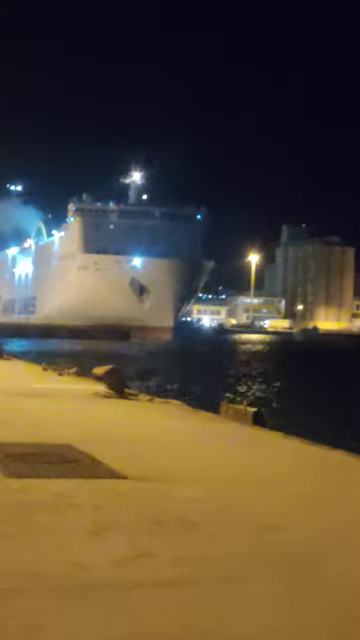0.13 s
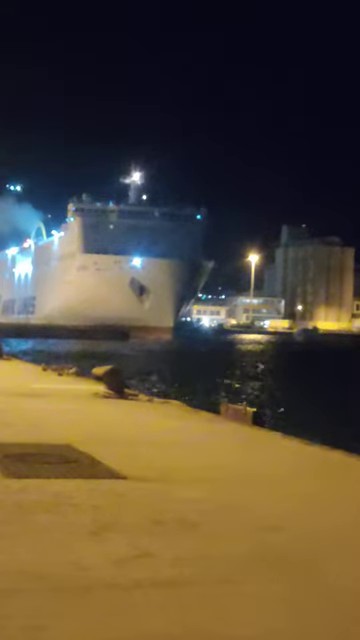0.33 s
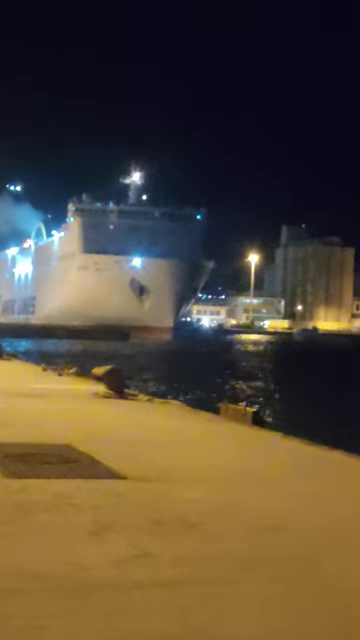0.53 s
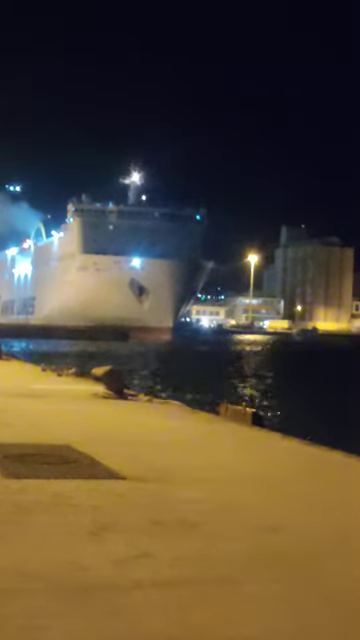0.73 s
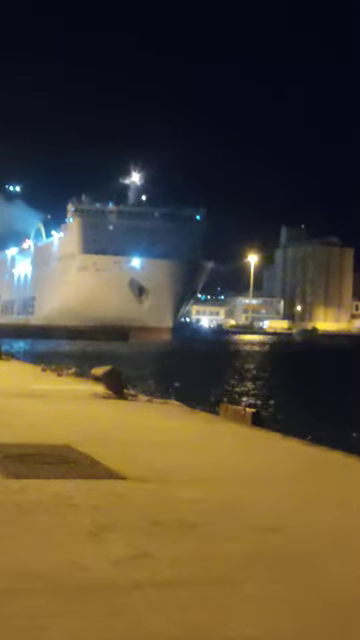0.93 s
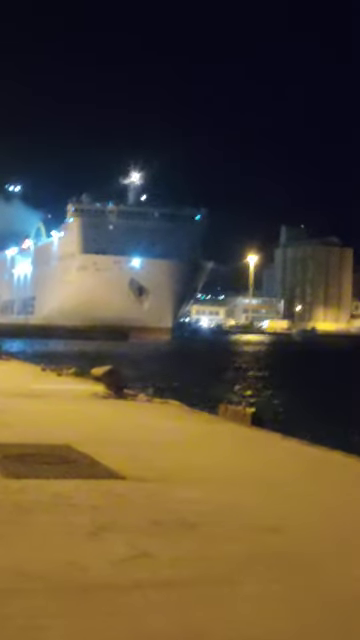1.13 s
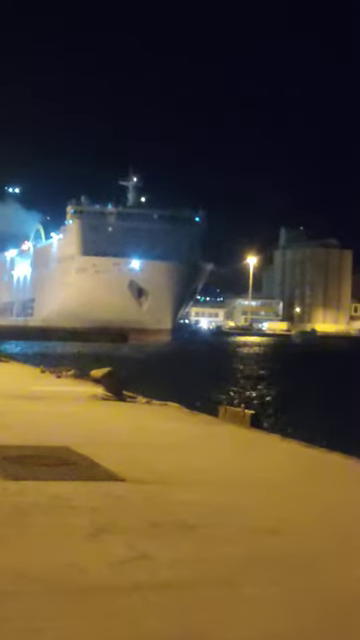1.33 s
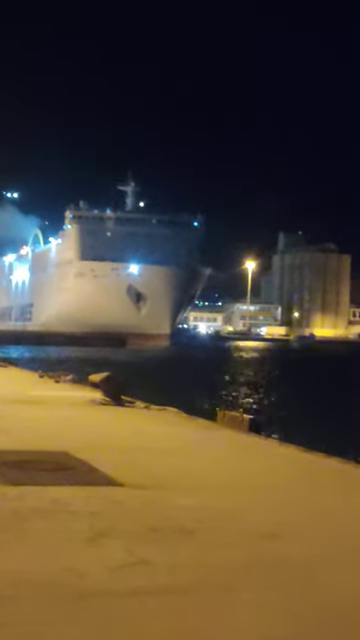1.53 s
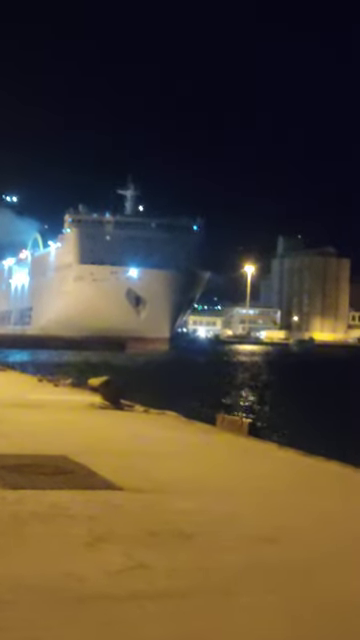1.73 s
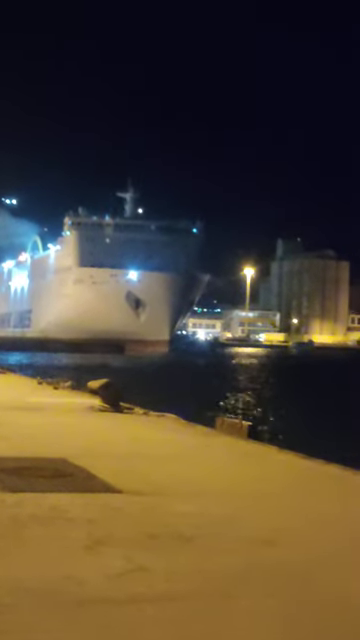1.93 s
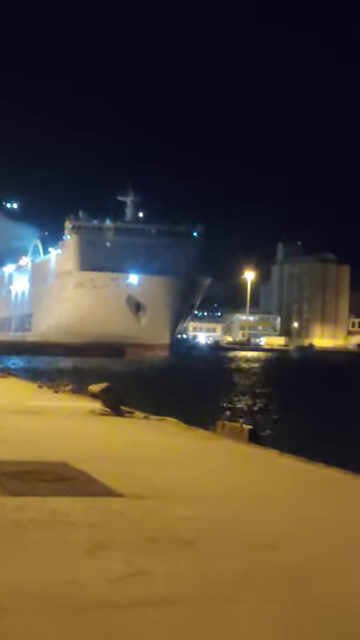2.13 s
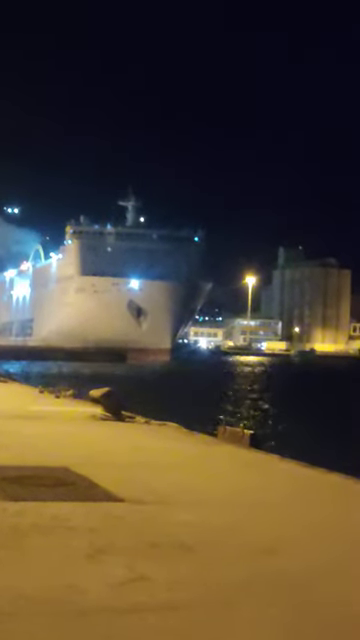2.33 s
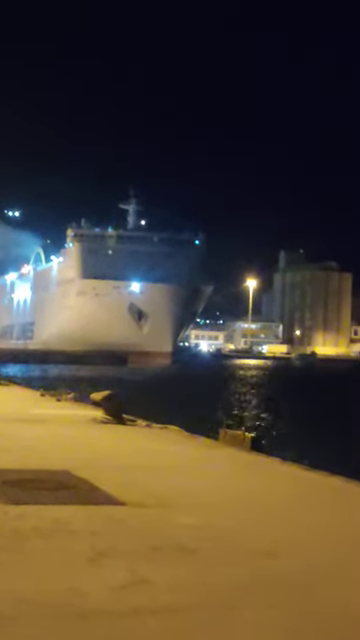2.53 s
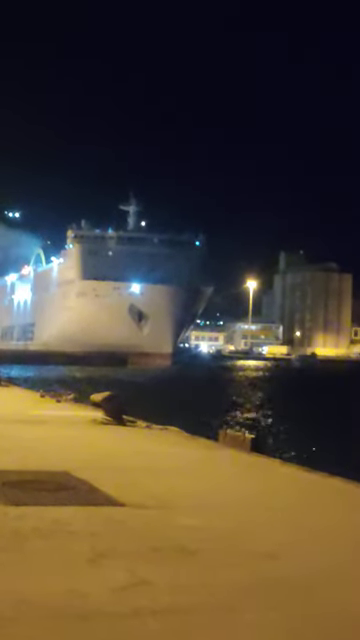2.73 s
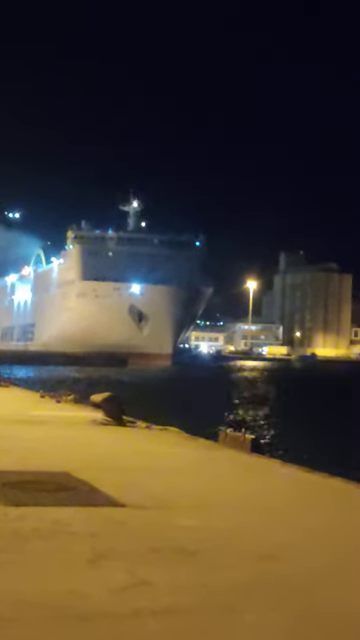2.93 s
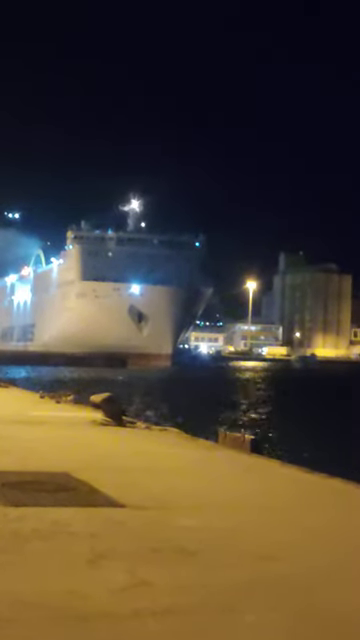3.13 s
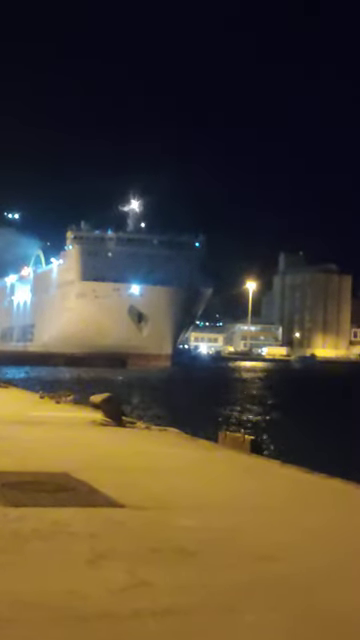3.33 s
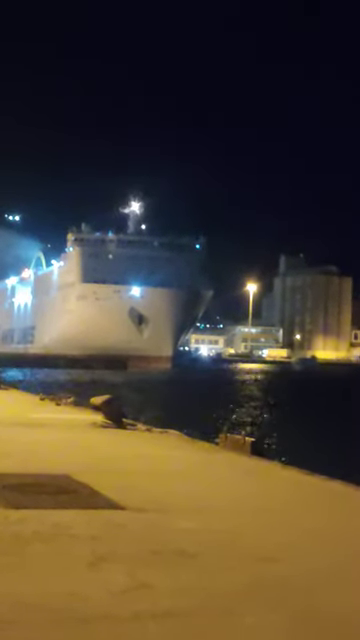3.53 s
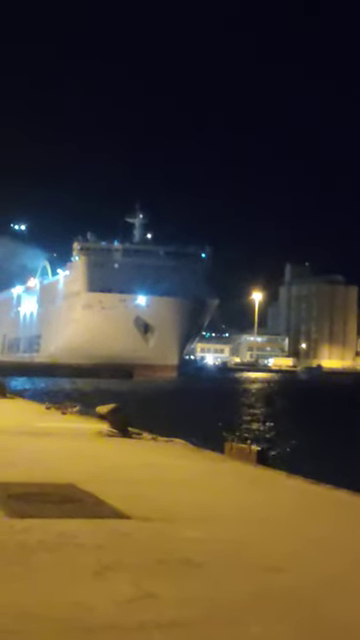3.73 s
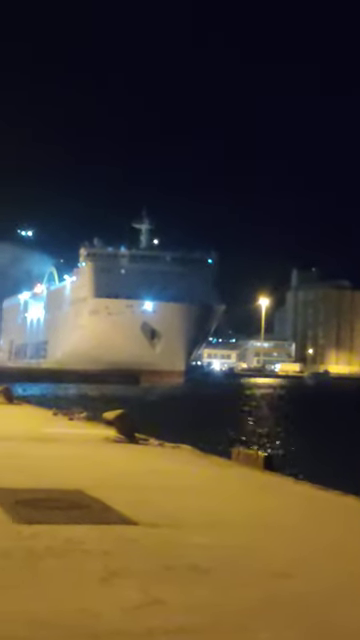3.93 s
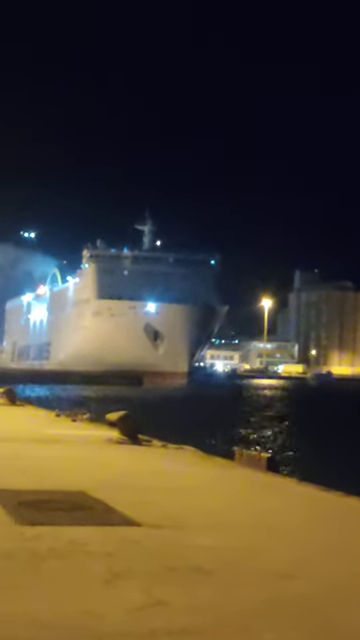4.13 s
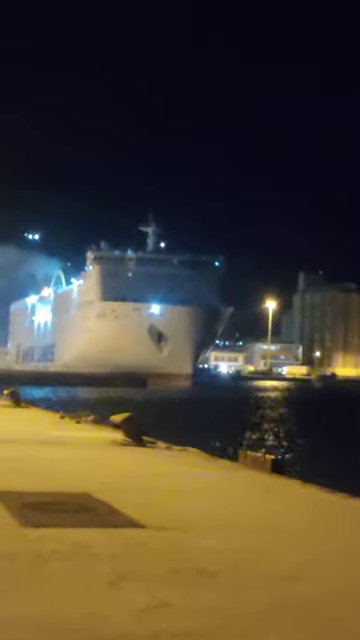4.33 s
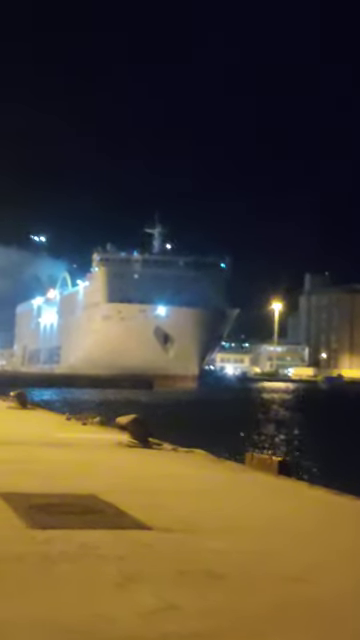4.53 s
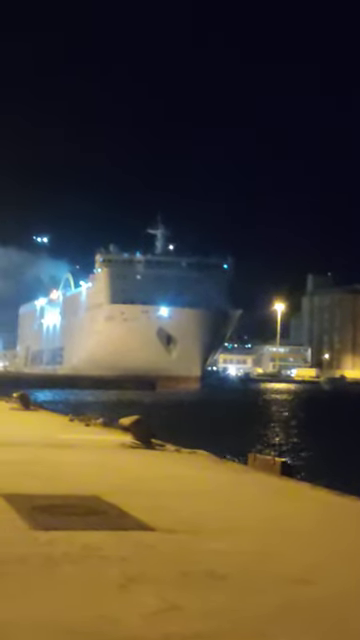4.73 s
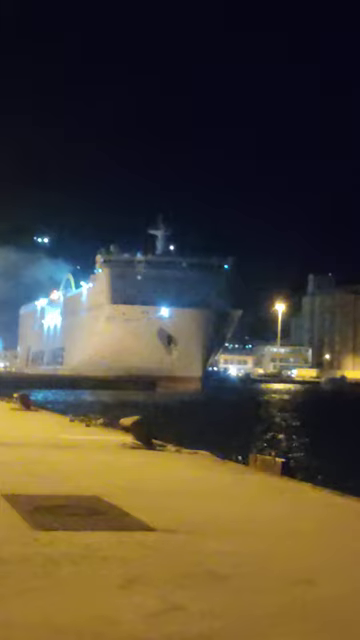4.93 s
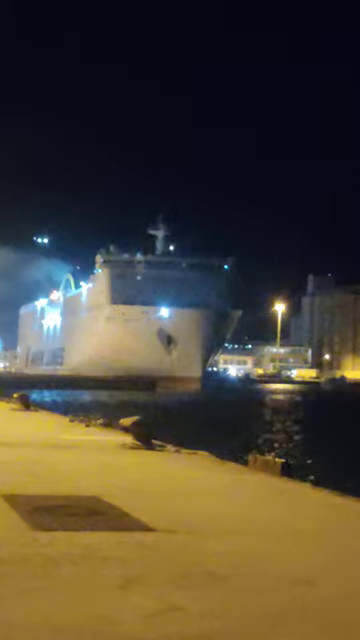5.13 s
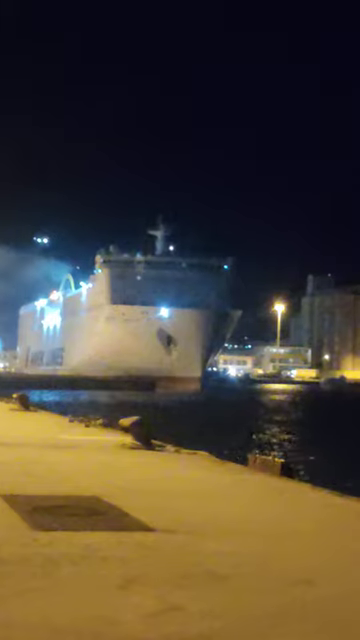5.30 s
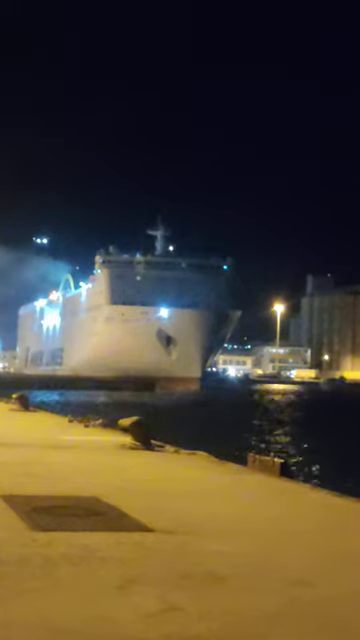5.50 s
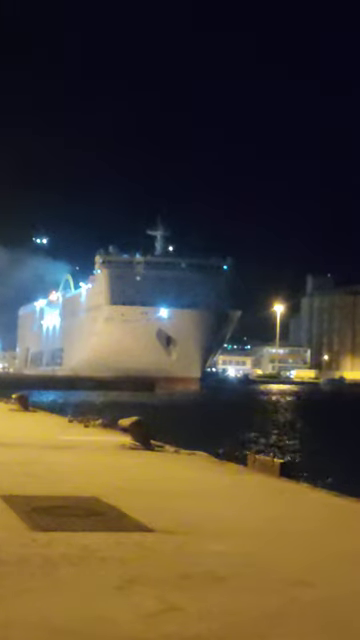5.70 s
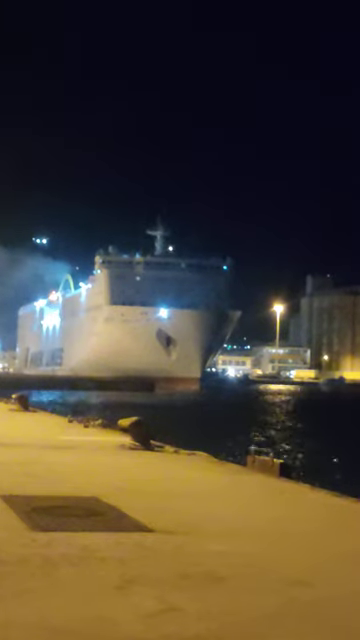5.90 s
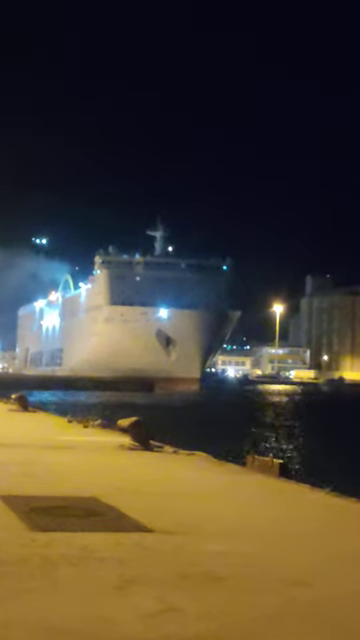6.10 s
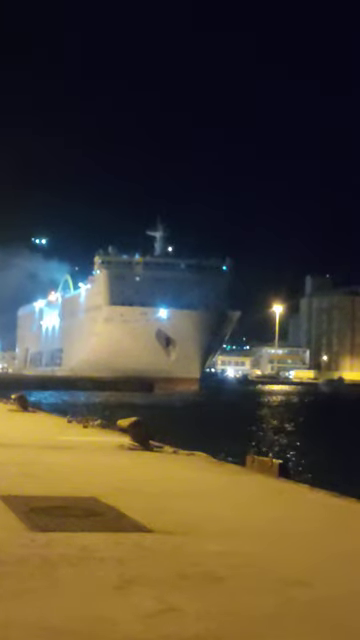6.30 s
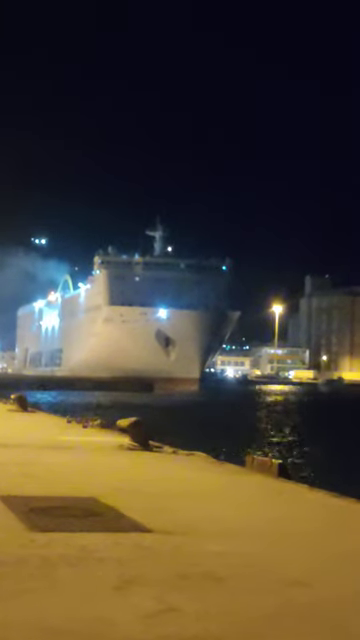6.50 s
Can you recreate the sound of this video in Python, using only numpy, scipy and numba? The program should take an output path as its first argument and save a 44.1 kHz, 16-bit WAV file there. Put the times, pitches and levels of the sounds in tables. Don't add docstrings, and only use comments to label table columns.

```python
import sys
import numpy as np
from scipy import signal
from scipy.fft import rfft, irfft, next_fast_len
from scipy.io import wavfile
from numba import njit

SR = 44100
rng = np.random.default_rng(int(sys.argv[2]) if len(sys.argv) > 2 else 0)


def volts_from_decibels(level):
    exponent = np.asarray(level, float) / 20
    return 10 ** exponent


def unload_wav(signal):
    wavfile.write(
        sys.argv[1],
        SR,
        np.round(np.clip(np.atleast_2d(signal).T, -1, 1) * 32767).astype(np.int16),
    )


N = 289119
TIME = np.arange(N) / SR
STEP = 32
SLOW = np.arange(N // STEP + 2) * STEP / SR
HIGH_HZ, DEEP_HZ = 164.7, 64.7
OPPOSITE = np.array([[1], [-1]])


def at_hz(points, hz, axis=1):
    points = np.array(points)
    return np.interp(np.log(hz), np.log(points[:, 0]), points[:, axis])


def rms_one(x):
    return x / np.sqrt(np.mean(x ** 2) + 1e-20)


def full(control):
    return np.interp(TIME, SLOW, control)


def drift(rate_hz):
    r = np.exp(-2 * np.pi * rate_hz * STEP / SR)
    chance = rng.standard_normal(len(SLOW) + 3000)
    return rms_one(signal.lfilter([1], [1, -2 * r, r * r], chance)[3000:])


def band(x, low_hz, high_hz, order=2):
    return signal.sosfilt(signal.butter(order, [low_hz, high_hz], "band", fs=SR, output="sos"), x)


def swells(rows, axis=1):
    rows = np.array(rows)
    return rows[:, [axis]] * np.exp(-((SLOW - rows[:, [0]]) / rows[:, [2]]) ** 2)


def valve(spans, rise_s, fall_s):
    air = 0
    for opens, shuts in spans:
        rise = np.clip((SLOW - opens) / rise_s, 0, 1) ** 2
        air = air + rise * np.exp(-np.clip((SLOW - shuts) / fall_s, 0, 30))
    return air


def hiss(colour, alike, balance, low_db, high_db, low_hz, high_hz, patchy_db, bass_db=0):
    size = next_fast_len(N)
    shape = volts_from_decibels(at_hz(colour, np.arange(1, size // 2 + 2) * SR / size))
    noise = irfft(rfft(rng.standard_normal((2, 2, size))) * shape, size)[..., :N]
    out, together = 0, drift(6.0)
    edges = 250 * 2 ** np.arange(0, 6.1, .5)
    for k, (low, high) in enumerate(zip(edges, edges[1:])):
        hz = np.sqrt(low * high)
        mid, side = band(noise[k % 2], low, high)
        likeness = np.clip(at_hz(alike, hz), -.8, 1)
        width = np.sqrt((1 - likeness) / (1 + likeness))
        up = np.clip(np.log(hz / low_hz) / np.log(high_hz / low_hz), 0, 1)
        db = (1 - up) * (low_db - at_hz(colour, low_hz)) + up * (high_db - at_hz(colour, high_hz))
        flicker_db = patchy_db * (.7 * together + drift(12.0))
        gain = full(volts_from_decibels(db + (hz < 700) * bass_db + flicker_db))
        pan = volts_from_decibels(at_hz(balance, hz) / 2 * OPPOSITE)
        out = out + gain * pan * (mid + width * side * OPPOSITE)
    return out


@njit
def add(out, turns, level, left, right, step):
    for j in np.flatnonzero(np.abs(level[:-1]) > 1e-5):
        for i in range(j * step, min(j * step + step, out.shape[1])):
            angle = 2 * np.pi * turns[i]
            now = level[j] + (i / step - j) * (level[j + 1] - level[j])
            wave = now * complex(np.cos(angle), np.sin(angle))
            out[0, i] += (left * wave).real
            out[1, i] += (right * wave).real


# frequency in Hz, left-right level in dB,
# left lead in radians.
PORT_SHADING = [(165, 4.0, -0.04), (329, 3.2, -0.28), (494, -3.4, -0.38), (824, 0.2, -0.24),
                (988, 4.1, 0.25), (1153, 7.2, 0.43), (1318, 0.4, -1.97), (1482, -7.4, 1.56),
                (1812, 4.0, 0.15), (1976, 1.1, -0.96), (2141, 5.6, 0.35), (2306, -6.1, 1.34),
                (2470, -8.5, -1.37), (2800, 4.0, -0.37)]


def partials(turns, hz, levels):
    out, side = np.zeros((2, N)), np.array([.5, -.5])
    for k, level in levels.items():
        lead = at_hz(PORT_SHADING, k * hz, axis=2)
        ports = volts_from_decibels(at_hz(PORT_SHADING, k * hz) * side) * np.exp(1j * lead * side)
        ports = np.sqrt(2) * ports / max(abs(ports.mean()), .6)
        add(out, k * turns, level + 0j, ports[0], ports[1], STEP)
    return out


# frequency in Hz, level in dB per Hz.
MURMUR_COLOUR = [(210, -38), (360, -8), (397, 0), (553, -7), (644, -7), (815, -13), (1170, -12),
                 (1440, -16), (2300, -20), (3400, -31), (5430, -37), (8330, -23), (9840, -36), (11000, -47),
                 (15000, -50), (21600, -120)]
# frequency in Hz, left-right likeness from -1 to 1.
MURMUR_ALIKE = [(60, 0.39), (120, 0.71), (250, 0.72), (520, 0.79), (1080, 0.79), (2220, 0.64),
                (4560, -0.49), (9390, 0.1)]
# frequency in Hz, left-right level in dB.
NOISE_BALANCE = [(300, 3), (1000, 1), (2000, .4), (4500, -2.5), (9000, 3)]
# peak time in seconds, lift in dB, half length in seconds.
WASHES = [(2.3, 7, .06), (2.7, 3, .25), (3.03, 8, .05), (3.15, 6, .08), (3.47, 4, .03), (3.63, 4, .04),
          (4.62, 10, .07), (4.81, 13, .05), (5.0, 15, .08), (5.06, 13, .04), (5.55, 6, .1), (5.66, 13, .05),
          (5.95, 8, .07), (6.07, 13, .1), (6.41, 10, .06)]


def murmur():
    wash_db = swells(WASHES).max(axis=0)
    ducked_db = 14 * valve([(-1, 2.18), (3.76, 4.54)], .02, .04)
    ring_db = 3 * np.minimum(valve(HIGH_OPEN, .02, .3), 1)
    low_db = -44.2 + .5 * wash_db + ring_db
    spray_db = -56.3 + .85 * wash_db - ducked_db
    return hiss(MURMUR_COLOUR, MURMUR_ALIKE, NOISE_BALANCE, low_db, spray_db, 1700, 8000,
                patchy_db=1.4, bass_db=-.4 * wash_db)


# start in seconds, peak level in dB, pitch in Hz.
BUBBLES = [
    (3.01, -40, 1500),
    (3.11, -41, 2300),
    (5.049, -28, 1000),
    (5.052, -36, 1750),
    (5.654, -30, 1150),
    (6.09, -39, 1350),
    (6.352, -38, 900),
    (6.11, -38, 730),
    (6.4, -42, 2100),
]


def plops():
    out, t = np.zeros(N), TIME[:2000]
    for s, db, hz in BUBBLES:
        ring = np.sin(2 * np.pi * hz * t * (1 + 3.0 * t))
        envelope = np.exp(-t * hz / 4.5) * np.minimum(t * hz, 1)
        out[round(s * SR):][:len(t)] += volts_from_decibels(db) * ring * envelope
    return out


def swing(turns):
    slowing = np.sin(2 * np.pi * 3.3 * np.log1p(turns / 2.5))
    return 2.1 * slowing * (1 - np.exp(-(turns / .65) ** 2)) * np.exp(-turns / 1.05)


# peak time in seconds, rumble lift in dB, half length in seconds,
# flutter lift in dB.
GUSTS_LEFT = [(.12, 16, .1, 18), (.264, 17, .05, 21), (.51, 16, .18, 14), (.958, 15, .05, 14),
              (1.19, 16, .1, 20), (1.39, 15, .1, 24), (1.83, 16, .14, 23), (2.22, 16, .07, 23),
              (2.4, 22, .06, 23), (2.47, 14, .07, 16), (2.815, 8, .03, 19), (3.08, 8, .08, 12),
              (3.31, 8, .09, 12), (3.5, 5, .04, 17), (3.92, 10, .14, 16), (4.16, 15, .06, 17),
              (4.44, 17, .16, 21), (4.82, 16, .05, 22), (4.92, 10, .04, 10), (5.09, 10, .04, 18),
              (5.19, 11, .04, 12), (5.32, 6, .05, 10)]
# peak time in seconds, rumble lift in dB, half length in seconds,
# flutter lift in dB.
GUSTS_RIGHT = [(.145, 15, .11, 21), (.52, 14, .1, 11), (1.07, 21, .08, 12), (1.13, 17, .1, 23),
               (1.3, 16, .12, 14), (1.55, 12, .08, 5), (1.9, 10, .13, 6), (2.19, 19, .05, 23),
               (2.555, 14, .04, 12), (2.94, 7, .04, 8), (3.565, 17, .06, 16), (3.69, 11, .09, 19),
               (3.83, 13, .06, 20), (4.21, 13, .11, 15), (4.43, 16, .11, 19), (4.835, 13, .06, 8),
               (5.243, 15, .05, 17), (5.425, 11, .035, 10), (5.7, 5, .12, 7), (6.15, 3, .2, 5),
               (6.5, 7, .12, 3)]
# start in seconds, peak level in dB, pitch in Hz, port (0 left, 1 right).
SLAPS = [(2.226, -5, 200, 0), (2.37, -8, 450, 0), (2.8, -18, 260, 0), (3.473, -8, 250, 0),
         (3.502, -6, 480, 0), (1.12, -7, 380, 1), (1.18, -6, 480, 1), (4.785, -12, 250, 0),
         (4.799, -10, 480, 0), (2.186, -8, 200, 1), (5.24, -16, 250, 1), (2.203, -10, 250, 0),
         (2.378, -9, 190, 0), (2.398, -13, 400, 0), (2.42, -13, 260, 0), (2.433, -12, 260, 0),
         (2.484, -12, 170, 0), (3.679, -22, 480, 1), (5.078, -20, 260, 0), (5.176, -24, 250, 0),
         (5.43, -24, 230, 1)]
# start in seconds, peak level in dB, left-right level in dB.
THUDS = [(0.245, -26, 11.5), (0.484, -24, 6.5), (1.028, -34, -12.0), (1.033, -20, -17.5),
         (1.316, -21, -8.5), (1.578, -30, 7.0), (1.789, -27, 9.0), (2.141, -23, -3.0), (2.155, -23, -4.0),
         (2.359, -19, 23.5), (2.635, -34, 4.5), (2.809, -30, 12.5), (3.204, -33, 5.0), (3.499, -32, 7.0),
         (3.506, -28, 1.0), (3.633, -24, -13.0), (3.811, -28, -5.5), (4.348, -23, 3.0), (4.811, -32, 13.0),
         (4.811, -23, 9.5), (4.99, -30, 14.5), (5.09, -30, 10.0), (5.175, -26, 11.5), (6.181, -34, 3.5)]


def wind():
    out, calm_db = np.zeros((2, N)), -40
    for port, gusts in enumerate((GUSTS_LEFT, GUSTS_RIGHT)):
        rumble_db = calm_db + swells(gusts).max(axis=0)
        flutter_db = calm_db + swells(gusts, axis=3).max(axis=0)
        white = rng.standard_normal((3, N))
        lumps = rms_one(volts_from_decibels(3.5 * drift(25.0)))
        rumble = full(volts_from_decibels(rumble_db - 1.1)) * rms_one(band(white[0], 22, 110, order=3))
        flutter = full(lumps * volts_from_decibels(flutter_db - .4)) * rms_one(band(white[1], 120, 320, order=3))
        bright_level = lumps * volts_from_decibels(1.6 * (flutter_db + 20) - 30)
        bright = full(bright_level) * rms_one(band(white[2], 330, 600, order=4))
        out[port] = rumble + flutter + bright
    t = TIME[:1500]
    for s, db, hz, port in SLAPS:
        out[port, round(s * SR):][:len(t)] -= volts_from_decibels(db) * swing(t * hz)
    t = TIME[:3000]
    for s, db, pan_db in THUDS:
        start = round(s * SR)
        shove = volts_from_decibels(db + 1) * swing(t * 85)
        out[int(pan_db < 0), start:][:len(t)] += shove[:N - start]
    return out


# start in seconds, peak level in dB, left-right level in dB.
TICKS = [(2.2753, -50, -0.5), (2.2908, -46, 0.5), (2.8949, -45, 0.5), (3.0815, -45, -1.0),
         (3.2366, -29, 8.0), (3.4626, -43, -4.0), (3.6387, -44, 5.0), (3.6651, -48, -0.5),
         (4.6053, -42, 8.5), (4.6332, -40, 5.5), (5.0562, -42, 0.5), (5.1236, -44, 6.0), (5.5152, -47, 3.0),
         (5.5531, -46, 2.5), (5.6509, -43, 3.0), (5.6633, -36, 4.0), (5.9282, -43, 2.5),
         (5.9547, -41, -1.0), (6.0634, -43, 2.5)]


def ticks():
    out, t = np.zeros((2, N)), TIME[:400]
    for (s, db, pan_db), snap in zip(TICKS, rng.standard_normal((len(TICKS), len(t)))):
        burst = volts_from_decibels(db + 7.0) * snap * np.exp(-t / .0011)
        out[:, round(s * SR):round(s * SR) + len(t)] += burst * volts_from_decibels(pan_db / 2 * OPPOSITE)
    out = out + 1e-18
    cavities = np.array([band(out[0], 6500, 9300, order=4), band(out[1], 5500, 8800, order=4)])
    return cavities + .2 * band(out, 3500, 9300, order=4)


def basin(x):
    t = TIME[:4 * SR]
    t60_s, shore_s, shore_width_s = 2.0, 1.5, .7
    dying = volts_from_decibels(-60 * t / t60_s) + .4 * np.exp(-((t - shore_s) / shore_width_s) ** 2)
    tail = band(rng.standard_normal((2, len(t))), 365, 760, order=3) * dying * (t > .03)
    tail = tail / np.sqrt(np.sum(tail ** 2, axis=1, keepdims=True))
    tail = tail[0] + .4 * tail[1] * OPPOSITE
    before = np.concatenate([x[:SR], x[:SR], x])
    return volts_from_decibels(-43) * signal.fftconvolve(tail, before[None])[:, 2 * SR:2 * SR + N]


# delay in seconds, smear in seconds, level of partial 1 in dB,
# level of partial 2 in dB.
QUAYS = [
    (.24, .04, -33, -36),
    (.75, .05, -39, -41),
    (1.25, .05, -38, -43),
    (1.79, .035, -31.5, -44),
    (2.5, .06, -46, -39),
]


def echoes():
    late = np.array([valve(np.array(HIGH_OPEN) + delay_s, 7.0 * smear_s, smear_s)
                     for delay_s, smear_s, _, _ in QUAYS])
    levels = {}
    for k in (1, 2):
        returned = np.sqrt(volts_from_decibels(np.array(QUAYS)[:, k + 1]) ** 2 @ late ** 2)
        beating = volts_from_decibels(1.6 * drift(14.0) + .6 * drift(3.0))
        levels[k] = returned * beating * np.exp(.6j * drift(3.0))
    return partials(HIGH_HZ * TIME, HIGH_HZ, levels)


# time in seconds, level in dB.
CLARITY = [
    [(0.02, -22), (0.97, -24), (1.39, -28), (1.43, -32), (1.46, -29), (1.57, -31), (1.83, -24), (2.16, -27)],
    [(3.79, -25), (3.798, -23), (3.844, -33), (3.858, -25), (4.372, -31), (4.52, -30)],
]


def clarity():
    s, db = np.vstack(CLARITY).T
    return np.interp(SLOW, s, db) + 27


# frequency in Hz, level in dB per Hz.
RUSH_COLOUR = [(300, -30), (450, -6), (750, 3), (1120, 3), (1230, -7), (1500, 0), (1750, -4), (2000, 0),
               (2750, -3), (3050, -14), (5000, -16), (7600, -18), (9000, -30), (10000, -52), (11000, -85)]
# frequency in Hz, left-right likeness from -1 to 1.
RUSH_ALIKE = [(60, 0.05), (120, 0.87), (250, 0.82), (520, 0.86), (1080, 0.72), (2220, 0.57), (4560, -0.12),
              (9390, -0.19)]
# peak time in seconds, lift in dB,
# half length in seconds.
FLARES = [(.175, 5, .05), (.54, 5, .04), (.74, 6, .08), (1.14, 4, .03), (1.25, 9, .09), (1.8, 4, .05),
          (2.15, 5, .06), (3.79, 9, .035), (3.93, 3, .04)]


def rush():
    low_db = 7.5 - 27 + clarity()
    high_db = -41.5 + 1.1 * clarity() + swells(FLARES).max(axis=0)
    air = full(valve([(-1, 2.178), (3.745, 4.535)], .025, .010))
    puffs = 0
    for hz, share in ((HIGH_HZ, .3), (3 * DEEP_HZ, .4), (DEEP_HZ, .3)):
        puffs = puffs + share * np.exp(1.5 * np.cos(2 * np.pi * hz * TIME))
    noise = hiss(RUSH_COLOUR, RUSH_ALIKE, NOISE_BALANCE, low_db, high_db, 2000, 6000, patchy_db=1.8)
    return noise * rms_one(.8 + puffs) * air


# level in dB of partials 1, 2, ..
OVERBLOW_PARTIALS = [-6, -8, -1, -5, -6, -7, -8, -13, -12, -7, -8, -9, -10, -16]
# opening in seconds, shutting in seconds.
OVERBLOW_OPEN = [
    (3.748, 3.812),
]


def overblow():
    air = valve(OVERBLOW_OPEN, rise_s=.032, fall_s=.011)
    levels = {k: volts_from_decibels(-22.5 + db) * air * np.exp(1j * rng.uniform(0, 6))
              for k, db in enumerate(OVERBLOW_PARTIALS, 1)}
    return partials(3 * DEEP_HZ * TIME, 3 * DEEP_HZ, levels)


def horn(hz, shape, fades, air, level_db, fade_db, wander):
    pockets, centres = swells(fades), np.array(fades)[:, 3]
    path = .17 * drift(25.0) + .3 * drift(4.0)
    levels = {}
    for k, db in shape.items():
        share = np.exp(-(np.log2(k * hz / centres) / .35) ** 2)
        shimmer = np.sqrt(k * hz / 1000)
        treble_db = (k * hz > 1200) * (.7 * clarity() - .6)
        fading_db = min(shimmer, 1) * fade_db * drift(2.5) + 1.3 * shimmer * drift(14.0)
        heard_db = level_db + db + share @ pockets + treble_db + fading_db
        phase = 22.0 * np.exp(-k * hz / 593.0) + .2 * rng.standard_normal()
        phase = phase + wander * shimmer * drift(1.5) + shimmer ** 2 * (path + .12 * drift(21.0))
        levels[k] = volts_from_decibels(heard_db) * air * np.exp(1j * phase)
    return partials(hz * TIME, hz, levels)


# level in dB of partials 3, 4, ..
DEEP_PARTIALS = [-26.5, -45, -42, -31, -48, -32, -33, -36, -27.5, -33, -40, -33, -34, -34, -35, -42, -44,
                 -38, -41, -43, -45, -45, -39, -38, -48, -45, -42, -47, -43, -44, -48, -45, -46, -44, -46,
                 -50, -47, -45]
# opening in seconds, shutting in seconds.
DEEP_OPEN = [
    (-1, 2.18),
    (3.795, 4.538),
]
# peak time in seconds, change in dB,
# half length in seconds, centre in Hz.
DEEP_FADES = [(.2, 3, .15, 194), (.25, -4, .25, 800), (.4, -5, .06, 850), (.8, 5, .2, 950),
              (1.05, 4, .12, 712), (1.22, -11, .06, 194), (1.4, -4, .25, 518), (1.48, -9, .12, 194),
              (1.75, 4, .2, 1100), (.7, 3, .15, 388), (.3, 2, .2, 580), (1.0, 3, .3, 580),
              (1.7, 3, .15, 200), (1.9, -2, .2, 600), (1.5, -3, .3, 1500), (4.1, 4, .3, 518),
              (4.3, -7, .35, 1100)]


def deep_horn():
    air = valve(DEEP_OPEN, rise_s=.04, fall_s=.012)
    shape = dict(enumerate(DEEP_PARTIALS, 3))
    return horn(DEEP_HZ, shape, DEEP_FADES, air, level_db=-.6, fade_db=2.2, wander=.9)


# level in dB of partials 1, 2, ..
HIGH_PARTIALS = [2.3, -.3, -8, -5.5, -5.5, -10, -10, -17, -16, -19, -15.5, -20, -21, -24, -24, -25, -27,
                 -38, -39, -42]
# opening in seconds, shutting in seconds.
HIGH_OPEN = [
    (-1, 2.18),
    (3.84, 4.532),
]
# peak time in seconds, change in dB,
# half length in seconds, centre in Hz.
HIGH_FADES = [(.15, -4, .2, 600), (.1, -3, .15, 1320), (.45, 3, .2, 660), (.7, 2, .2, 990),
              (1.0, 3, .15, 520), (.05, 3, .2, 1050), (1.0, -3, .3, 720), (3.95, 2, .15, 400),
              (1.3, -2, .15, 1100), (1.6, -3, .3, 1500), (1.9, 3, .2, 1150), (.55, 3, .15, 2700),
              (1.5, -3, .2, 2300), (.5, 2, .3, 165), (.55, -3, .25, 330), (.8, 3, .2, 494),
              (1.08, -8, .13, 165), (1.1, 4, .4, 750), (1.4, -3, .6, 330), (1.3, -3, .15, 165),
              (1.4, -8, .15, 494), (1.98, -4, .12, 330), (2.02, -8, .14, 165), (2.0, -7, .25, 620),
              (3.9, -3, .08, 165), (4.1, -3, .4, 900), (4.15, 5, .3, 494), (4.22, -3, .15, 330),
              (4.45, -5, .2, 1050)]


def high_horn():
    air = valve(HIGH_OPEN, rise_s=.02, fall_s=.012)
    shape = dict(enumerate(HIGH_PARTIALS, 1))
    return horn(HIGH_HZ, shape, HIGH_FADES, air, level_db=-18.5, fade_db=1.2, wander=.4)


def scene():
    horns = high_horn() + deep_horn() + overblow()
    background = murmur() + plops() + wind() + ticks()
    return background + basin(horns[0]) + echoes() + rush() + horns


def low_pass(x):
    return signal.sosfilt(signal.butter(12, 15100, fs=SR, output="sos"), x)


def record(dry):
    opening = np.sin(np.pi / 2 * np.minimum(TIME / .001, 1)) ** 2
    mix = opening * 1.5 * np.tanh(dry / 1.5)
    return low_pass(mix)


dry = scene()
out = record(dry)
unload_wav(out)
```